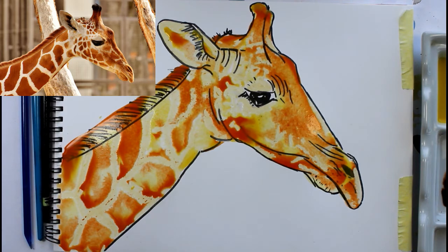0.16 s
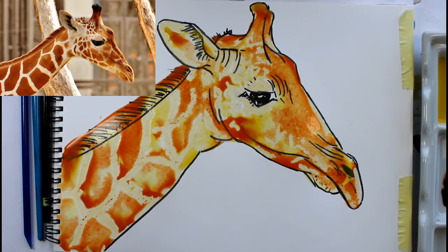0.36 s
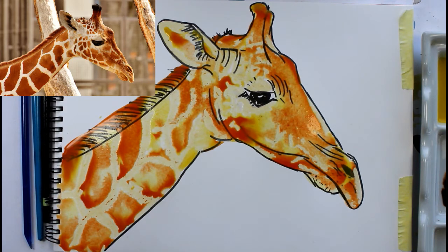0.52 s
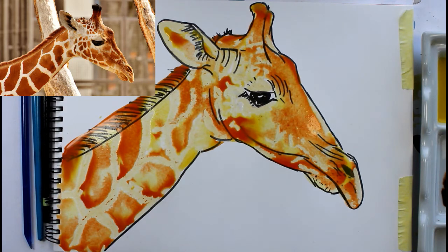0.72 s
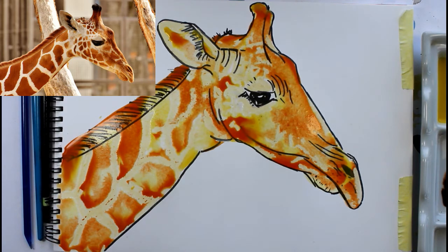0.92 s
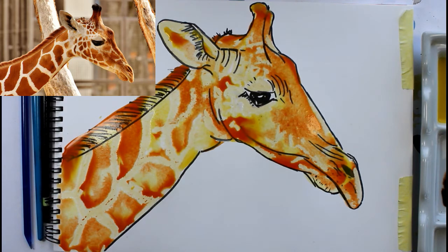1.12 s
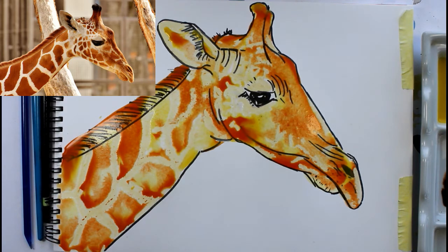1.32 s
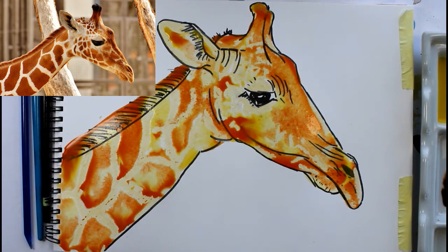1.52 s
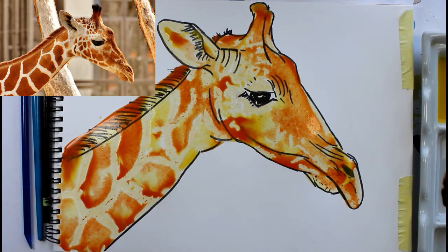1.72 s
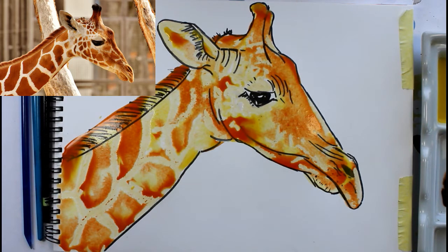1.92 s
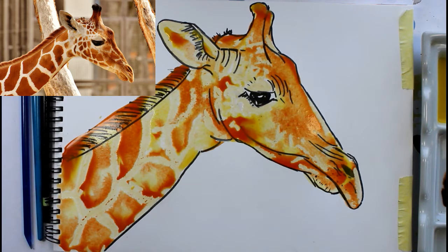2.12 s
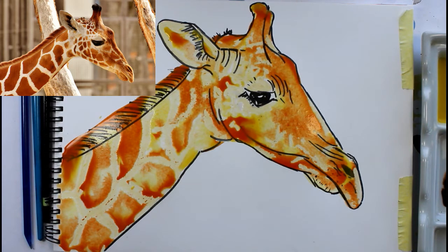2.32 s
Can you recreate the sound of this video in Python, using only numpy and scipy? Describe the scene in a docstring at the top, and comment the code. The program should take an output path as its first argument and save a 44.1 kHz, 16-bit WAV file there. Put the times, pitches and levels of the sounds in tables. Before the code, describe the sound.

A paintbrush swishes in a glass jar of water, drips, then clinks once on the rim.

```python
"""In a small quiet room, a paintbrush is swished in a glass jar of water and knocks against its wall.
Bubbles ring as damped oscillators, coloured by the resonances of the jar. Lifted out, the brush drips,
then clinks once on the rim: the impact excites the normal modes of the glass, which rings on.
The wet bristles rub softly, with a few light taps. Gain control ducks after the clink."""
import sys
import numpy as np
from scipy import signal
from scipy.fft import rfft, irfft, next_fast_len
from scipy.io import wavfile
from scipy.ndimage import uniform_filter1d, map_coordinates

SR = 44100
rng = np.random.default_rng(int(sys.argv[2]) if len(sys.argv) > 2 else 0)


def unload_audio(sound):
    """Save the sound as a 16-bit wav file, at the path given as the first command line argument."""
    columns = np.transpose(np.atleast_2d(sound))
    # keep every value between -1 and 1, then stretch to whole-number steps
    steps = np.round(np.clip(columns, -1, 1) * 32767)
    wavfile.write(sys.argv[1], SR, steps.astype(np.int16))


N = 108177
TIME = np.arange(N) / SR
CLINK_S, SPLASH_ATTACK_S = 1.4287, 0.0013


def amp(db):
    """Decibels to amplitude ratio."""
    return 10 ** (np.asarray(db) / 20)


def unit(x):
    """Normalisation to rms 1."""
    return x / np.sqrt(np.mean(x ** 2) + 1e-20)


def along(points, hz):
    """Interpolation on a logarithmic frequency axis."""
    frequencies, values = np.transpose(points)
    return np.interp(np.log(hz + 1), np.log(frequencies + 1), values)


def curve(rows):
    """Linear interpolation in time, one value per sample."""
    return np.interp(TIME, *np.transpose(rows))


def wobble(knots_per_s):
    """Smooth random modulation: a spline through Gaussian knots."""
    return map_coordinates(rng.standard_normal(int(N * knots_per_s / SR) + 4), [TIME * knots_per_s])


def filtered(x, response):
    """Linear filtering: the spectrum times a frequency response."""
    size = next_fast_len(N + SR // 2)
    return irfft(rfft(x, size) * response(np.fft.rfftfreq(size, 1 / SR)), size)[:N]


def coloured(x, colour):
    """Spectral shaping by rows of frequency_hz, gain_db."""
    return filtered(x, lambda hz: amp(along(colour, hz)))


def noise(colour):
    """Spectrally shaped Gaussian noise of rms 1."""
    return unit(coloured(rng.standard_normal(N), colour))


def fade(t, t60):
    """Exponential damping: 60 dB in t60 seconds."""
    return np.exp(-np.log(1000) * t / t60)


def add(track, start_s, sound):
    """Superposition of a sound on the track."""
    part = track[max(round(start_s * SR), 0):][:len(sound)]
    part += sound[:len(part)]


def tone(hz, waver_hz=14.8, knots_per_s=250):
    """Random frequency modulation: a sine of slightly unsteady pitch."""
    knots = rng.standard_normal(N // 64)
    drift = np.interp(TIME * knots_per_s, np.arange(len(knots)), knots)
    return np.sin(2 * np.pi * np.cumsum(hz + waver_hz * drift) / SR)


def ring(modes, scatter_db=1, attack_s=0.00036):
    """Free vibration: damped modes waver with the moving water, their levels varying at each blow."""
    t = TIME[:SR]
    partials = sum(amp(db + scatter_db * rng.normal()) * fade(t, t60) * tone(hz)[:SR]
                   for hz, db, t60 in modes)
    return partials * (1 - np.exp(-(t / attack_s) ** 2))


def burst(colour, t60, attack_s=0.0002):
    """A broadband transient: noise with a fast rise and exponential decay."""
    onset = 1 - np.exp(-(TIME / attack_s) ** 2)
    return (noise(colour) * fade(TIME, t60) * onset)[:SR]


# reverberation time: frequency_hz, t60_s
ROOM_DECAY = [(150, 0.55), (1200, 0.26), (5000, 0.37), (12000, 0.23)]
# reverberation spectrum: frequency_hz, gain_db
ROOM_COLOUR = [(100, 4.5), (300, 2.5), (8500, -7), (12000, 3), (16000, -21)]
def in_room(x, wet_db, delay_s=0.00296):
    """Reverberation: direct sound plus its convolution with a noise tail that decays band by band."""
    hz, t, spectrum = signal.stft(rng.standard_normal(SR // 2), SR, nperseg=256)
    shape = fade(t, along(ROOM_DECAY, hz)[:, None]) * amp(along(ROOM_COLOUR, hz))[:, None]
    tail = signal.istft(spectrum * shape, SR, nperseg=256)[1]
    tail *= TIME[:len(tail)] > delay_s
    return x + amp(wet_db) * signal.fftconvolve(x, tail / np.linalg.norm(tail))[:N]


# background spectrum: frequency_hz, gain_db
RUMBLE_COLOUR = [(25, 0.5), (130, 1.5), (170, -4), (300, -15), (550, -17), (1000, -17.5), (2200, -22),
                 (4000, -22), (7500, -28), (9500, -33.5), (12000, -51), (15500, -35)]
def room_rumble():
    """Ambient noise: stationary and strongest at low frequencies."""
    return amp(-48) * noise(RUMBLE_COLOUR)


# envelope of the rocking water: time_s, level_db
ROCKING_LEVEL = [(.5, -51), (.7, -64.5), (.88, -59.5), (.98, -51), (1.1, -54.5), (1.3, -55), (1.42, -52.5),
                 (1.54, -65), (1.585, -50), (1.66, -56.5), (1.8, -81)]
# its spectrum: frequency_hz, gain_db
ROCKING_COLOUR = [(80, -23), (250, -1), (520, 1.5), (900, -4.5), (1600, -4.5), (3000, -16), (9000, -39)]
def rocking_water():
    """Sloshing: water still rocking in the jar makes a low noise that swells and sinks."""
    return amp(curve(ROCKING_LEVEL)) * noise(ROCKING_COLOUR)


# envelope of the rubbing: time_s, level_db
RUB_LEVEL = [(1.45, -79), (1.6, -54.5), (1.72, -56.5), (1.92, -49), (2.05, -55.5), (2.2, -50),
             (2.35, -48.5), (2.45, -49)]
# its spectrum: frequency_hz, gain_db
RUB_COLOUR = [(200, 5), (700, 0.5), (1600, 3), (3000, 1), (5100, -1), (8000, -0.5), (10000, -13.5),
              (13000, -35), (16000, -47)]
# light taps of the brush: start_s, level_db
TAPS = [(1.58, -37.5), (2.096, -43), (2.107, -36.5), (2.3204, -33)]
# their spectrum: frequency_hz, gain_db
TAP_COLOUR = [(200, -6), (1000, 0.5), (1750, 7), (2600, -0.5), (5100, -7), (9000, -10), (14000, -56)]
def bristles(sing_s=2.285, sing_width_s=0.044):
    """Friction: the wet brush rubs softly, taps now and then and briefly makes the glass sing."""
    out = amp(curve(RUB_LEVEL) + 1.6 * wobble(39.5)) * noise(RUB_COLOUR)
    for start_s, db in TAPS:
        add(out, start_s, amp(db) * burst(TAP_COLOUR, t60=0.039))
    swell = np.exp(-((TIME - sing_s) / sing_width_s) ** 2)
    out += amp(-53.5) * swell * tone(hz=5100, waver_hz=25.3)
    return in_room(out, wet_db=-12.5)


# spectrum of fizz and spatter: frequency_hz, gain_db
SPRAY_COLOUR = [(500, -14), (2500, -9.5), (3300, 2), (4300, -5.5), (5100, -0.5), (6000, -9), (7000, -2.5),
                (8200, -1.5), (9300, -10.5), (11000, -24), (15000, -51)]
# droplets hitting the glass: start_s, level_db
SPATTERS = [(.011, -47), (0.058, -38), (.129, -41), (0.19, -40), (0.204, -41), (0.261, -44), (0.298, -39),
            (0.36, -53), (.38, -47), (0.608, -48), (0.625, -49), (0.662, -42), (0.892, -46), (1.03, -43.5),
            (1.131, -40.5), (1.236, -47.5), (1.992, -47.5)]
def spray(swish_db, pops_per_s=500):
    """Shot noise: tiny bubbles burst at random under the swishing; droplets spatter on the glass."""
    pops = (rng.random(N) < pops_per_s / SR).astype(float)
    out = amp(swish_db - 24) * unit(coloured(pops, SPRAY_COLOUR))
    for start_s, db in SPATTERS:
        add(out, start_s, amp(db) * burst(SPRAY_COLOUR, t60=0.041, attack_s=SPLASH_ATTACK_S))
    return in_room(out, wet_db=-8)


def bubble(hz, db, t60, rise=0.098, attack_s=0.00058, jostle_rad=0.42, knots_per_s=506):
    """Bubble resonance: a damped oscillation rises in pitch, jostled by the water around it."""
    t = TIME[:int(t60 * SR) + 2]
    knots = rng.standard_normal(256)
    jostle = jostle_rad * np.interp(t * knots_per_s, np.arange(len(knots)), knots)
    phase = 2 * np.pi * hz * (t + rise * t * t / (2 * t60)) + jostle
    return amp(db) * np.sin(phase) * fade(t, t60) * (1 - np.exp(-t / attack_s))


def froth(swish_db, length_s=0.7, bubbles_per_s=240, lowest_hz=758, pitch_ratio=11.5):
    """A bubble population: random short resonances follow the swishing, the higher ones weaker."""
    out = np.zeros(N)
    for when, height, size in rng.random((int(bubbles_per_s * length_s), 3)):
        start_s = when * length_s
        spread_db = 2 * min(-np.log(1 - size), 2)
        db = swish_db[int(start_s * SR)] - 5.5 + spread_db - 6.5 * height
        add(out, start_s, bubble(lowest_hz * pitch_ratio ** height, db, t60=0.024))
    return out


# drops falling from the brush: start_s, pitch_hz, level_db, t60_s
DRIPS = [(0.623, 3300, -45, 0.075), (0.8745, 2030, -26, 0.015), (0.885, 6850, -49, 0.033),
         (.928, 6750, -46, .04), (1.0213, 3030, -32, 0.025), (1.0203, 3730, -34.5, 0.055),
         (1.074, 1910, -32.5, 0.025), (1.0845, 2200, -30.5, 0.056), (1.085, 3650, -39, 0.063),
         (1.1107, 1680, -25.5, .04), (1.1276, 1763, -26, 0.031), (1.1524, 1848, -28, 0.043),
         (1.2166, 1406, -35, .04), (2.098, 1700, -44.5, 0.07)]
# splash spectrum: frequency_hz, gain_db
SPLASH_COLOUR = [(600, -12), (1700, -1), (4000, -13), (8000, -10), (11000, -38), (15000, -55)]
def drips(glass_hz=2350, glass_t60=0.16):
    """Drop impact: each drip traps a ringing bubble, splashes and faintly excites the glass."""
    out = np.zeros(N)
    for start_s, hz, db, t60 in DRIPS:
        add(out, start_s, bubble(hz, db, t60))
    for start_s, _, db, _ in DRIPS:
        splash = amp(db - 16) * burst(SPLASH_COLOUR, t60=0.024, attack_s=SPLASH_ATTACK_S)
        add(out, start_s, splash + ring([(glass_hz, db - 14, glass_t60)]))
    return out


# spectrum of the stirred water: frequency_hz, gain_db
WASH_COLOUR = [(100, -13), (300, -9), (650, -18), (900, -7), (1130, 4), (1800, -9), (2750, -11.5),
               (4000, -27), (8000, -50), (11000, -61), (15000, -51.5)]
# distinct bubbles: start_s, pitch_hz, level_db, t60_s
BUBBLES = [(.001, 1060, -20.5, 0.015), (.0055, 1135, -13, 0.02), (.007, 2453, -24.5, 0.03),
           (.012, 776.5, -26.5, 0.1), (.029, 1087, -18.5, 0.039), (.047, 3640, -28.5, 0.011),
           (.060, 8000, -42, .02), (.062, 2680, -36.5, 0.058), (0.086, 3282, -40.5, 0.11),
           (0.09, 1440, -22.5, 0.011), (.0905, 2060, -24, 0.031), (.126, 2620, -34.5, 0.063),
           (.128, 1078, -37.5, 0.17), (0.159, 1190, -28, 0.027), (.162, 7950, -35.5, 0.032),
           (.163, 2697, -38, 0.1), (0.192, 1100, -34, 0.12), (0.2243, 3520, -34, 0.046),
           (0.224, 1280, -28, 0.018), (.229, 4940, -30, 0.039), (.243, 1367, -13.5, 0.026),
           (.248, 1490, -11, 0.023), (0.258, 3220, -29, 0.044), (0.275, 1570, -37, 0.023),
           (.279, 614, -34, 0.17), (.293, 1140, -22, 0.025), (0.298, 8000, -30, 0.016),
           (0.304, 6680, -31.5, 0.038), (.32, 2690, -33.5, 0.062), (0.362, 1280, -21, 0.017),
           (0.366, 1085, -28, 0.11)]
def swish(swish_db):
    """Air entrainment: the brush stirs up a fluttering wash of noise and clear bubble tones."""
    out = amp(swish_db - 7 + 2.7 * wobble(68.3)) * noise(WASH_COLOUR)
    for start_s, hz, db, t60 in BUBBLES:
        add(out, start_s, bubble(hz, db, t60))
    return out


# resonances of the air in the jar and the glass wall: centre_hz, bandwidth_hz, gain_db
JAR_RESONANCES = [(634, 10, -7), (1111, 44, -6), (1235, 34, -12), (2736, 85, -4.5), (3284, 70, -1.5)]
def jar_response(hz):
    """Forced resonance: second-order band-pass responses add to the direct path."""
    return 1 + sum(amp(db) * 1j * hz * width / (centre ** 2 - hz ** 2 + 1j * hz * width)
                   for centre, width, db in JAR_RESONANCES)


# envelope shared by wash, froth and fizz: time_s, relative_level_db
SWISH_LEVEL = [(0.0, -29.5), (0.006, -29.5), (0.07, -36.5), (0.236, -37), (0.246, -48), (0.268, -36),
               (0.38, -33.5), (0.43, -48)]
def water(swish_end_s=0.547, settle_db_per_s=113):
    """Source and filter: swish, drips and froth drive the jar's resonances; the spray bypasses them."""
    swish_db = curve(SWISH_LEVEL) - settle_db_per_s * np.maximum(TIME - swish_end_s, 0)
    excitation = swish(swish_db) + drips() + froth(swish_db)
    return in_room(filtered(excitation, jar_response), wet_db=-9.5) + spray(swish_db)


# blows on the wall: start_s, gain_db
KNOCKS = [(.161, -34.5), (0.4377, -14.5), (.4508, -14), (.4805, -23)]
# modes of jar and handle together: pitch_hz, relative_level_db, t60_s
KNOCK_MODES = [(100, -27, 0.27), (211.4, -21.5, 0.093), (431, -21.5, .05), (643, -17, .05),
               (753, -19.5, 0.068), (1164, -13.5, 0.085), (1334, -11.5, 0.043), (2535, -15, 0.043),
               (2595, -11, 0.078), (2950, -13, 0.044), (3360, -12, 0.023), (3750, -12, 0.027),
               (4900, -9.5, 0.14), (4920, -14, 0.083), (5140, -16.5, 0.084), (7060, -13.5, 0.057)]
# contact noise spectrum: frequency_hz, gain_db
KNOCK_CRACK = [(100, -22.5), (700, -4), (1800, -11), (2700, 3.5), (4200, -6), (5000, 3), (6300, -10),
               (8800, -12), (11000, -40.5), (15000, -39)]
def knocks():
    """Impact excitation: the handle rattles against the wall of the jar and both ring."""
    out = np.zeros(N)
    for start_s, db in KNOCKS:
        modes = ring(KNOCK_MODES, scatter_db=2.5)
        crack = amp(-1.5) * burst(KNOCK_CRACK, t60=0.051)
        add(out, start_s, amp(db) * (modes + crack))
    return in_room(out, wet_db=-11)


# envelopes of the lasting glass tones: time_s, low_tone_relative_db, high_pair_relative_db
GLASS_LEVELS = [(1.47, -40.5, -48), (1.502, -48, -66), (1.548, -60, -42), (1.614, -37, -42),
                (1.64, -55.5, -72), (1.674, -44.5, -54), (1.708, -60.5, -71), (1.742, -50.5, -71),
                (1.774, -68, -68), (1.798, -54.5, -73), (1.826, -68, -72), (1.86, -67, -73)]
def glass_tones(fade_db_per_s=124):
    """Light damping: after the clink, a low tone and a beating high pair swell and fade."""
    times, low_db, high_db = np.transpose(GLASS_LEVELS)
    low = amp(np.interp(TIME, times, low_db) + 2.5) * unit(tone(hz=2343, waver_hz=5.37))
    pair = unit(amp(-2) * tone(hz=5170) + tone(hz=5160))
    high = amp(np.interp(TIME, times, high_db) - 3.5) * pair
    release = amp(-fade_db_per_s * np.maximum(TIME - times[-1], 0))
    return (TIME > CLINK_S) * release * (low + high)


# short-lived modes of the struck rim: pitch_hz, relative_level_db, t60_s
CLINK_MODES = [(2276, -22.5, 0.032), (3760, -16.5, 0.043), (4615, -18.5, 0.046), (4556, -16, 0.045),
               (5240, -21, .05), (5223, -0.5, 0.04), (5360, -9, 0.021), (5790, -14.5, 0.034),
               (7630, -25.5, 0.072), (7770, -22, 0.056), (8030, -18.5, 0.091), (9320, -23, 0.049),
               (9620, -29, 0.06)]
# long ring of the glass and thud of the table: pitch_hz, relative_level_db, t60_s
AFTERRING = [(169, -41, 0.29), (212.4, -43, 0.31), (2346, -35, 0.41), (3801, -48, 0.23), (7402, -45, 0.46),
             (8400, -46, 0.41)]
# contact noise spectrum: frequency_hz, gain_db
CLINK_CRACK = [(100, -38), (700, -37), (1400, -12), (3000, -12), (5200, -5), (6500, -8), (9500, -11),
               (11500, -45), (15000, -40)]
def clink():
    """Impulse response: one hard blow of the ferrule on the rim excites the modes of the glass."""
    out = np.zeros(N)
    modes = ring(CLINK_MODES) + ring(AFTERRING)
    crack = amp(-14) * burst(CLINK_CRACK, t60=0.031)
    add(out, CLINK_S, amp(0.5) * (modes + crack))
    return in_room(out, wet_db=-15.5)


def scene():
    """Superposition: water, glass and brush over the rumble of the room, in one channel."""
    return (rocking_water() + water() + knocks() + clink() + glass_tones() + bristles()
            + room_rumble())[None]


# microphone response: frequency_hz, gain_db
MICROPHONE = [(9500, -0.5), (12000, 7), (16000, -17)]
def record(dry, threshold_db=-12, slope=0.61, attack_s=0.024, recover_db_per_s=23, cutoff_hz=15800):
    """Automatic gain control: loud sounds duck the gain, which recovers slowly; then clip and low-pass."""
    x = dry[0]
    level_db = 10 * np.log10(np.abs(uniform_filter1d(x * x, size=64)) + 1e-12)
    target_db = slope * np.maximum(level_db - threshold_db, 0)
    recovery_db = recover_db_per_s * TIME
    held_db = np.maximum.accumulate(target_db + recovery_db) - recovery_db  # peak hold, linear release
    pole = np.exp(-1 / (attack_s * SR))
    duck_db = signal.lfilter([1 - pole], [1, -pole], held_db)
    clipped = np.clip(coloured(x * amp(-duck_db), MICROPHONE), -1, 1)
    return filtered(clipped, lambda hz: 1 / np.sqrt(1 + (hz / cutoff_hz) ** 80))[None]


dry = scene()
out = record(dry)
unload_audio(out)
```